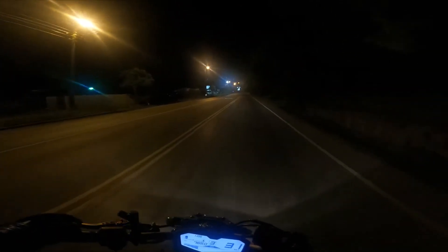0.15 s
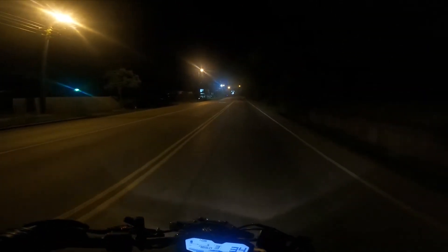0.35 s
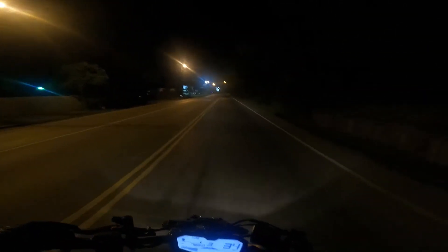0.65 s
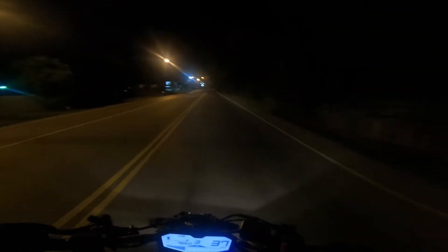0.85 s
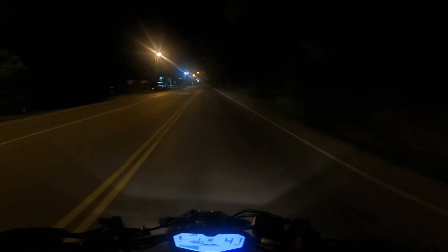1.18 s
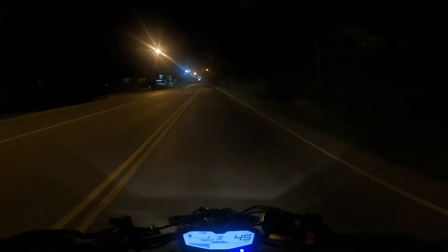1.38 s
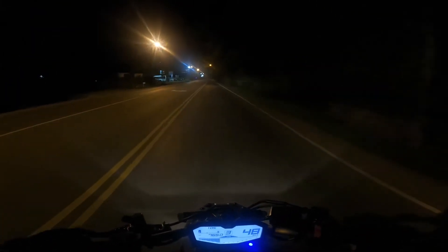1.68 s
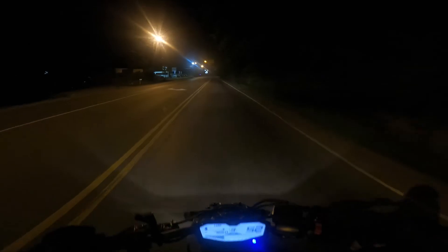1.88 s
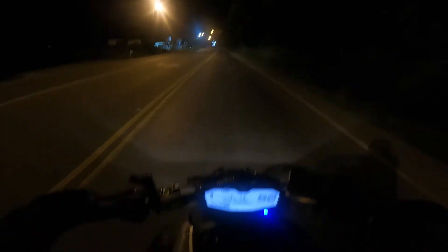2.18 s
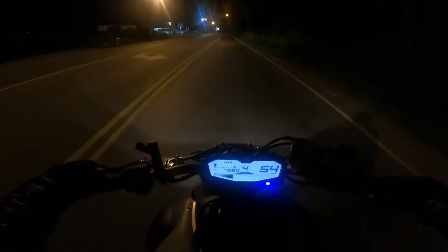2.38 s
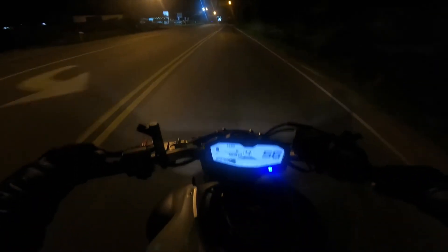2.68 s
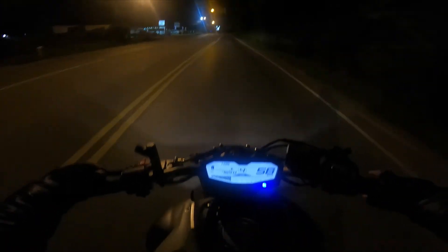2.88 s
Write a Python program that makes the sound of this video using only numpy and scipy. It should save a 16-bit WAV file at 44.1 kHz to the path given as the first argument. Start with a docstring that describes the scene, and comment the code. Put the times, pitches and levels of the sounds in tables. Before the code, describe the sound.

A twin-cylinder motorcycle accelerates, heard from the rider's seat, its throaty growl rising over light ticking, a faint whine and low wind. A bump clacks and rattles at 0.2 seconds, and a soft roadside hiss passes around 0.6. At about 1.9 seconds the engine falls to a soft burble for an upshift. It returns at 2.1 with a quick blip, then climbs slowly from a lower pitch until 3 seconds.

```python
"""A twin-cylinder motorcycle accelerates, shifts up and pulls on, heard from the rider's seat.
Two unevenly spaced intake gulps per engine cycle ring the airbox and ducts, over valve clatter,
a gear whine and wind. For the shift the throttle closes, leaving a soft exhaust burble.
Early on, a bump rattles the bike and a roadside hiss goes by."""
import sys
import numpy as np
from scipy import signal
from scipy.fft import rfft, irfft
from scipy.io import wavfile

SR = 44100
rng = np.random.default_rng(int(sys.argv[2]) if len(sys.argv) > 2 else 0)


def generate_wav(sig):
    """Save sig (samples, or channels by samples) to the path in sys.argv[1] as 16-bit PCM at SR."""
    pcm = np.round(np.clip(np.atleast_2d(sig).T, -1, 1) * 32767).astype(np.int16)
    wavfile.write(sys.argv[1], SR, pcm)


N = 134505
T = np.arange(N) / SR
CRUISE_HZ = 28  # engine speeds are four-stroke cycles per second

STROKE_STARTS_CYCLES = [.168, .54]
# intake stroke per cylinder: (rise [cycles], fall [cycles], level [dB])
STROKES = [(0.029, 0.125, -.5), (0.02, 0.1308, -0.5)]
# gain of ducts and rasp: (time [s], gain [dB])
BARK = [(0, 1), (.7, 0.5), (.95, 2.5), (1.5, 4), (1.85, -1), (2.18, 2.5), (2.25, -1.5), (2.6, 0),
        (3.05, -1)]


def from_db(db):
    """Decibels to gain."""
    return 10 ** (np.asarray(db) / 20)


def rms_one(x):
    """Scale to unit rms."""
    return x / np.sqrt(np.mean(x ** 2) + 1e-20)


def curve(rows):
    """Join (time [s], value) rows by straight lines."""
    return np.interp(T, *np.transpose(rows))


def drift(rate_hz):
    """Random wander, unit rms."""
    r = np.exp(-2 * np.pi * rate_hz / SR)
    return rms_one(signal.lfilter([1], [1, -2 * r, r * r], rng.standard_normal(N + SR))[SR:])


def noise(spectrum):
    """Unit-rms noise shaped by (frequency [Hz], density [dB]) rows."""
    hz, db = np.transpose(spectrum)
    bins_hz = np.arange(N // 2 + 1) * SR / N + 1e-3
    gain = from_db(np.interp(np.log(bins_hz), np.log(hz), db))
    low_cut = np.minimum(bins_hz / hz[0], 1) ** 2
    return rms_one(irfft(rfft(rng.standard_normal(N)) * gain * low_cut, N))


def resonate(x, hz, width_hz):
    """One resonance, unit peak gain."""
    r = np.exp(-np.pi * width_hz / SR)
    feedback = [1, -2 * r * np.cos(2 * np.pi * hz / SR), r * r]
    return signal.lfilter(np.array([1, 0, -1]) * (1 - r * r) / 2, feedback, x + 1e-18)


def lowpass(x, hz):
    """Two-pole low-pass."""
    return signal.sosfilt(signal.butter(2, hz, fs=SR, output="sos"), x)


def gain_per_turn(turns, spread_db):
    """A new, bounded random gain for every turn."""
    gains = from_db(spread_db * np.clip(rng.standard_normal(N), -2, 1))
    return gains[np.floor(turns).astype(int) + 1]


def wind(gust_db=1.5):
    """Lumpy low buffeting of the passing air."""
    # (frequency [Hz], density [dB])
    spectrum = [(12, -11.5), (28, -0.5), (60, -10.5), (120, -11.5), (250, -20), (500, -23.5), (1000, -34),
                (3000, -49), (9000, -71)]
    # (time [s], level [dB])
    level = [(0, -17), (1, -23), (1.9, -19.5), (2.1, -22), (2.29, -17), (2.45, -20.5), (3.05, -15)]
    return from_db(curve(level) + gust_db * drift(5.9)) * noise(spectrum)


def roadside(pass_s=.66, sag_per_s=.3, swell_s=.08):
    """A hiss, perhaps insects, with two shrill bands that sink as the bike passes."""
    # (time [s], level [dB])
    level = [(.3, -69), (.42, -46), (.52, -37), (.7, -39.5), (.75, -42), (.79, -76)]
    # hiss: (frequency [Hz], density [dB])
    spectrum = [(1200, -24), (2500, -3), (4200, -4), (5500, -8), (7200, -11.5), (9500, -18.5), (11500, -26),
                (15000, -35)]
    # shrill bands: (centre [Hz], width [Hz], level [dB])
    bands = [(4280, 130, -2), (7150, 170, -10)]
    warped_s = np.cumsum(1 - sag_per_s * (T - pass_s)) / SR
    shrill = sum(from_db(db) * rms_one(drift(width) * np.sin(2 * np.pi * hz * warped_s))
                 for hz, width, db in bands)
    swell = np.exp(-((T - pass_s) / swell_s) ** 2 / 2)
    return from_db(curve(level)) * (noise(spectrum) + shrill * swell)


def bump(at_s=.21, clack_db=-20.5, clack_decay_s=.0098, rattle_db=-34.5, rattle_decay_s=.26):
    """A dry clack, then a faint rattle of loose parts."""
    # both: (frequency [Hz], density [dB])
    clack_spectrum = [(600, -8), (1400, 14), (1900, 9), (2700, -8), (4700, 2), (6000, -20), (10000, -20),
                      (15000, -34)]
    rattle_spectrum = [(1000, 1), (1400, 2), (1900, 7), (2600, -23), (4700, -13), (9000, -29)]
    age_s = np.maximum(T - at_s, 0)
    clack = from_db(clack_db) * np.exp(-age_s / clack_decay_s) * noise(clack_spectrum)
    rattle = from_db(rattle_db) * np.exp(-age_s / rattle_decay_s) * noise(rattle_spectrum)
    return (age_s > 0) * (clack + rattle)


def clatter(cycle, speed_hz, throttle, ticks_per_cycle=8, decay_cycles=.075):
    """Valves and chain: a hiss with uneven ticks, louder with revs and throttle."""
    # (frequency [Hz], density [dB])
    spectrum = [(300, 8), (800, 1), (1300, 6.5), (1950, -7), (2300, -2.5), (2550, -10.5), (3000, -3),
                (3800, -15.5), (4600, -18.5), (5200, -19), (6700, -22.5), (8500, -27.5), (12000, -32),
                (15500, -52)]
    turns = cycle * ticks_per_cycle
    ticks = np.exp(-(turns % 1) / ticks_per_cycle / decay_cycles) * gain_per_turn(turns, spread_db=9.5)
    level_db = -32 - 5 * (1 - throttle) + .31 * (speed_hz - CRUISE_HZ)
    return from_db(level_db) * rms_one((1 + .3 * ticks) * noise(spectrum))


def gear_whine(cycle, teeth_per_cycle=40, wobble_rad=.3):
    """Gear teeth, throbbing with the crank, sing when they meet a casing resonance."""
    # (time [s], gain [dB])
    level = [(.78, -37), (.9, -30.5), (1.2, -28.5), (1.5, -43), (2.2, -35.5), (2.8, -31.5), (3.05, -43)]
    teeth = np.sin(2 * np.pi * teeth_per_cycle * cycle + wobble_rad * drift(26))
    throb = 1 + 2.6 * np.cos(2 * np.pi * cycle) + .5 * np.cos(4 * np.pi * cycle)
    return from_db(curve(level)) * resonate(teeth * throb, hz=1118.4, width_hz=28)


def exhaust(flow):
    """Soft burble: smoothed flow pulses ring the exhaust."""
    # (frequency [Hz], width [Hz], gain [dB])
    modes = [(81.7, 9, -0.5), (141.5, 33, 2.5), (276, 17, -4.5)]
    soft_flow = lowpass(flow, hz=420)
    return sum(from_db(db) * resonate(soft_flow, hz, width) for hz, width, db in modes)


def roar(cycle, speed_hz, full_speed_hz=33, db_per_hz=2.65):
    """Near top revs turbulence rings the ducts, swelling once per cycle."""
    # (centre [Hz], width [Hz], level [dB])
    bands = [(850, 160, -31), (1414, 510, -35.5)]
    ringing = 0
    for hz, width, db in bands:
        band = resonate(rng.standard_normal(N), hz, width)
        ringing += from_db(db) * rms_one(resonate(band, hz, width))
    swell = 1 + .58 * np.cos(2 * np.pi * (cycle - .45))
    return from_db(db_per_hz * np.minimum(speed_hz - full_speed_hz, 0)) * swell * ringing


def arch(cycle, length_cycles):
    """One half-sine pulse per cycle."""
    return np.sin(np.pi * np.minimum(cycle % 1 / length_cycles, 1))


def rasp(cycle, speed_hz, lead_cycles=.088):
    """Turbulent air while an intake valve is open, stronger at higher revs."""
    # (frequency [Hz], density [dB])
    spectrum = [(250, 7), (500, -15), (850, 5.5), (1400, -6), (2000, -14), (3200, -12), (6000, -34),
                (15000, -42.5)]
    gate = sum(from_db(db) * arch(cycle - start + lead_cycles, length_cycles=.28)
               for start, (_, _, db) in zip(STROKE_STARTS_CYCLES, STROKES))
    level_db = -26 + curve(BARK) + .13 * (speed_hz - CRUISE_HZ)
    return from_db(level_db) * gate * noise(spectrum)


def valve_snaps(cycle, delay_cycles=.1318, level_db=-16.5):
    """A small pressure blip as each intake valve shuts."""
    return from_db(level_db) * sum(arch(cycle - start - delay_cycles, length_cycles=.037) ** 2
                                   for start in STROKE_STARTS_CYCLES)


def gulps(cycle, hold_cycles=.0033, jitter_cycles=.001):
    """Air flow of both cylinders: each stroke rises fast, holds and falls away."""
    flow = 0
    for start, (rise, fall, db) in zip(STROKE_STARTS_CYCLES, STROKES):
        turns = cycle - start + jitter_cycles * drift(20)
        pulse = np.interp(turns % 1, np.cumsum([0, rise, hold_cycles, fall]), [0, 1, 1, 0])
        flow += from_db(db) * pulse * gain_per_turn(turns, spread_db=.5)
    return flow


def intake(cycle, speed_hz, throttle, duct_lead_cycles=.014):
    """The gulps boom in the airbox and bark, slightly earlier, in the ducts."""
    # both: (frequency [Hz], width [Hz], gain [dB], polarity, slope [dB per Hz above cruise])
    airbox_modes = [(161.6, 41.4, 8, -1, -0.33), (248, 31, -0.5, -1, -1)]
    duct_modes = [(413, 24, -9.5, 1, -0.23), (465.3, 51, 3, 1, 0), (728, 31, -4, -1, 0.012),
                  (828, 99, 10, -1, -0.34), (915, 45, 7.5, -1, 0.49), (1136, 28, 7, -1, 0.15),
                  (1380, 250, 1.5, -1, 0.77)]
    # deepest and upper airbox resonances: (time [s], gain [dB])
    boom_level = [(0, -17), (1, -4.5), (1.6, 0), (1.9, 0.5), (2.4, -7.5), (3.05, -8.5)]
    chest_level = [(0, -1), (.5, -1.5), (1.05, 4), (1.5, 1.5), (1.9, -19), (3.05, -17)]

    def ring(drive, modes):
        return sum(sign * resonate(drive * from_db(db + slope * (speed_hz - CRUISE_HZ)), hz, width)
                   for hz, width, db, sign, slope in modes)

    flow = throttle * gulps(cycle)
    duct_cycle = cycle + duct_lead_cycles
    duct_flow = throttle * (gulps(duct_cycle) + valve_snaps(duct_cycle))
    boom = -from_db(curve(boom_level)) * resonate(flow, hz=60.2, width_hz=17)
    chest = -from_db(curve(chest_level)) * resonate(flow, hz=274.7, width_hz=45)
    bark = from_db(curve(BARK)) * ring(duct_flow, duct_modes)
    return lowpass(boom + chest + ring(flow, airbox_modes) + bark, hz=3700)


def scene(close_s=1.858, closing_s=.045, open_s=2.092, opening_s=.035):
    """Engine speed and throttle drive the bike; wind, bump and roadside add to it."""
    # (time [s], engine speed [cycles/s])
    revs = [(0, 21.78), (.15, 21.97), (.42, 23.77), (.85, 27.03), (1.16, 29.25), (1.5, 31.35),
            (1.885, 34.02), (1.97, 29.32), (2.09, 23.26), (2.16, 30.64), (2.24, 26.89), (2.4, 27.52),
            (2.7, 28.38), (3.05, 29.35)]
    speed_hz = curve(revs)
    cycle = np.cumsum(speed_hz) / SR
    throttle = np.clip(1 - (T - close_s) / closing_s, 0, 1)  # closed for the shift
    throttle += np.clip((T - open_s) / opening_s, 0, 1)
    engine = intake(cycle, speed_hz, throttle)
    engine += exhaust(gulps(cycle) * (1 - throttle))
    engine += throttle * (rasp(cycle, speed_hz) + roar(cycle, speed_hz) + gear_whine(cycle))
    engine += clatter(cycle, speed_hz, throttle)
    return (engine + wind() + bump() + roadside())[None]


def record(dry):
    """Round the peaks, cut the top treble."""
    ceiling, cutoff_hz = .88, 15700
    rounded = ceiling * np.tanh(dry / ceiling)
    return signal.sosfilt(signal.ellip(10, .1, 80, cutoff_hz, fs=SR, output="sos"), rounded)


dry = scene()
out = record(dry)
generate_wav(out)
```